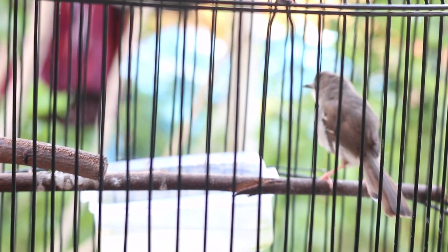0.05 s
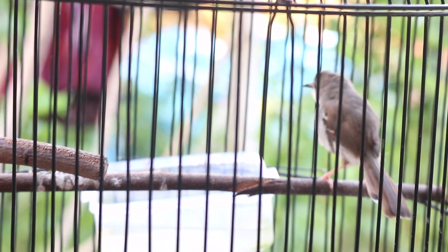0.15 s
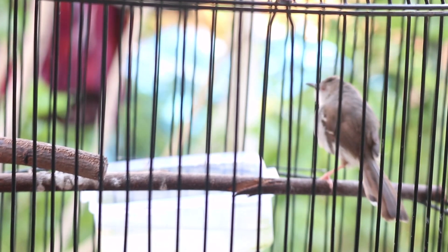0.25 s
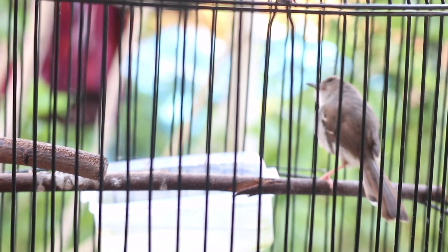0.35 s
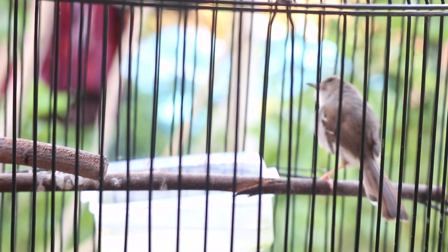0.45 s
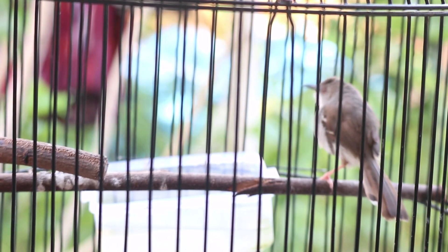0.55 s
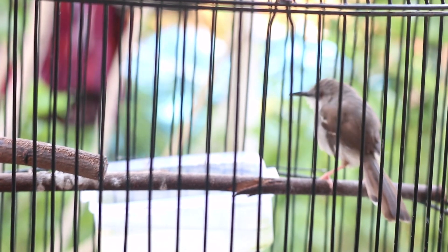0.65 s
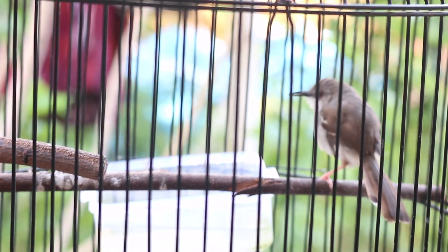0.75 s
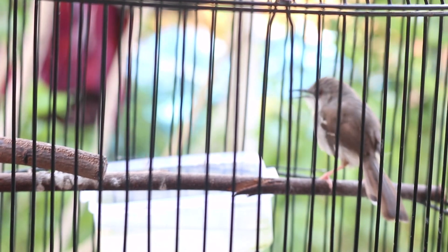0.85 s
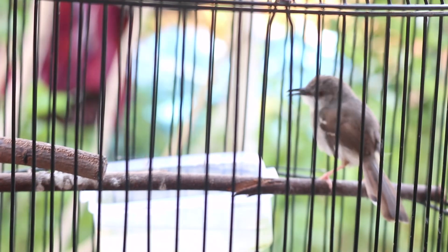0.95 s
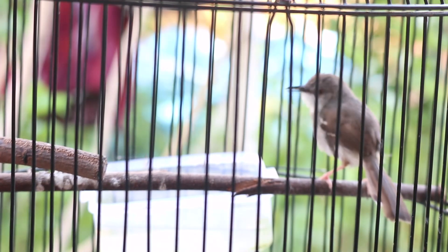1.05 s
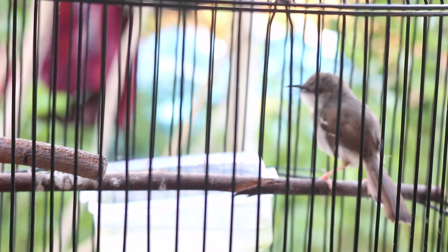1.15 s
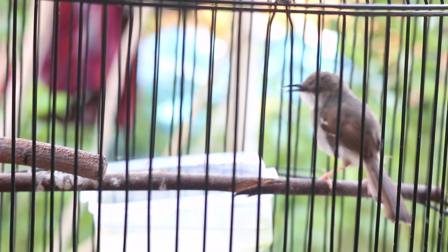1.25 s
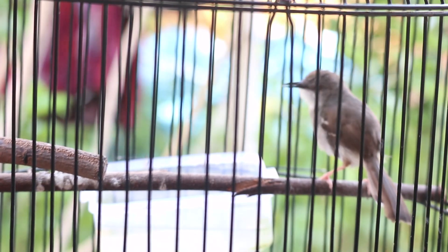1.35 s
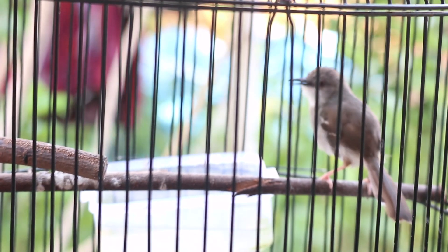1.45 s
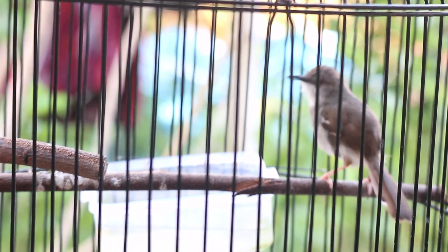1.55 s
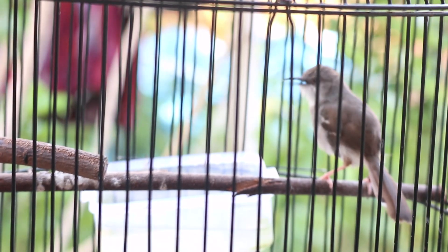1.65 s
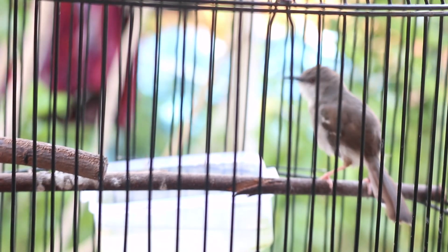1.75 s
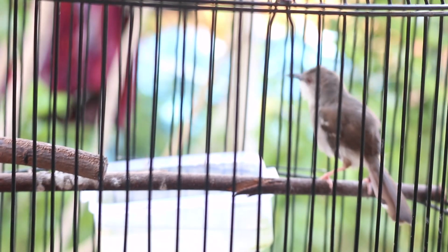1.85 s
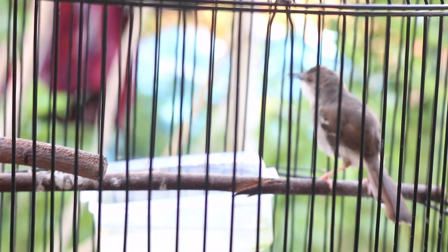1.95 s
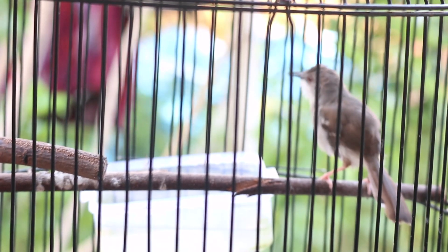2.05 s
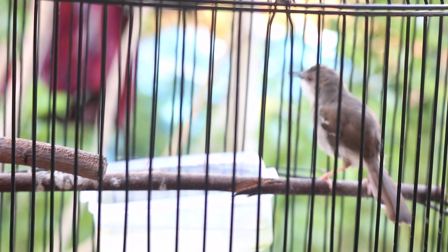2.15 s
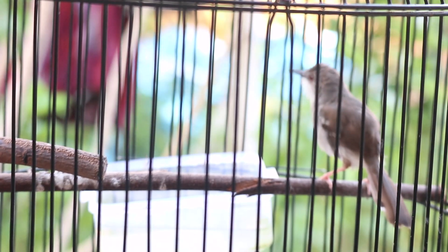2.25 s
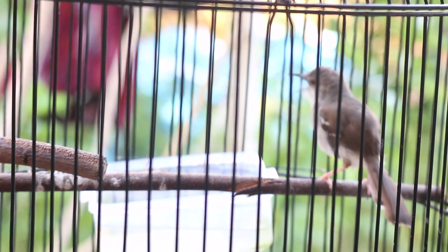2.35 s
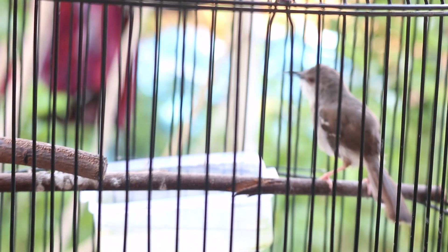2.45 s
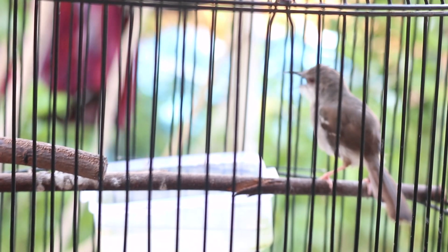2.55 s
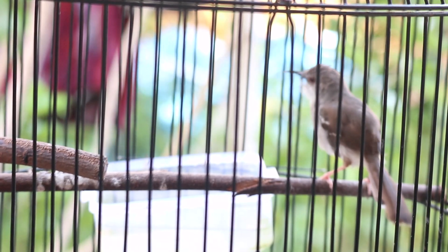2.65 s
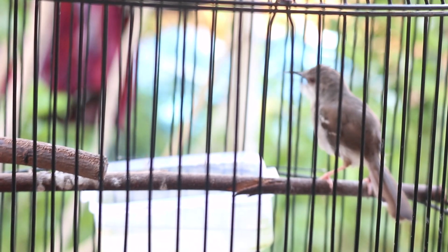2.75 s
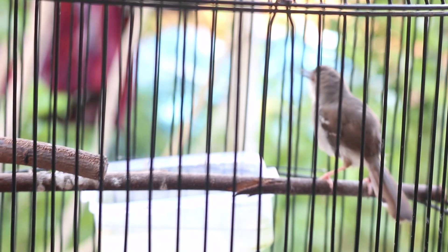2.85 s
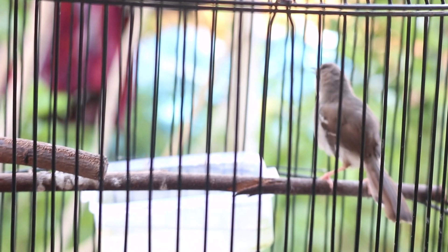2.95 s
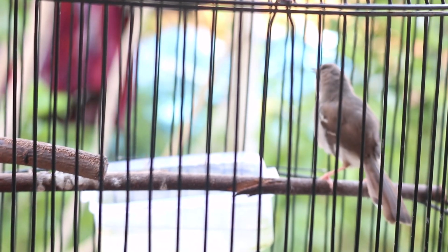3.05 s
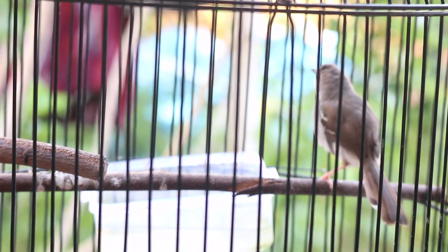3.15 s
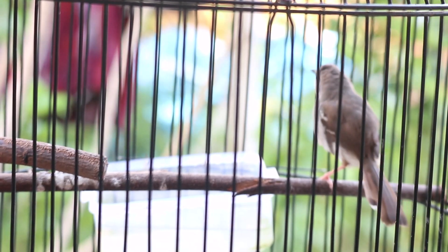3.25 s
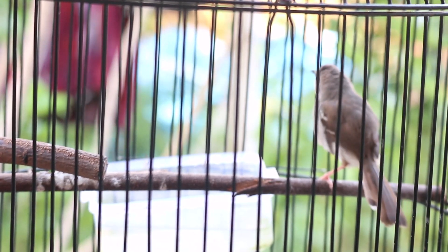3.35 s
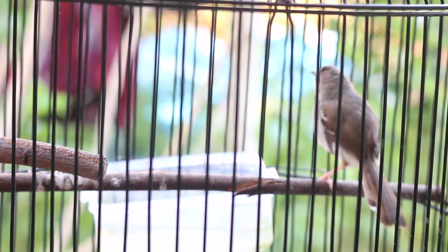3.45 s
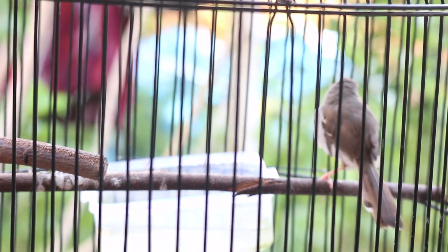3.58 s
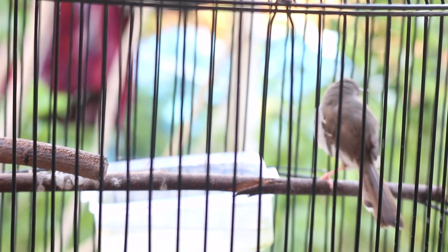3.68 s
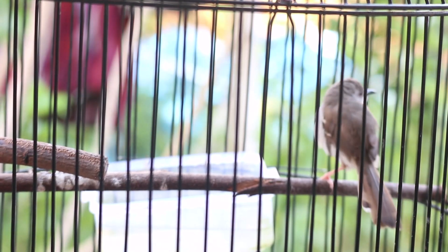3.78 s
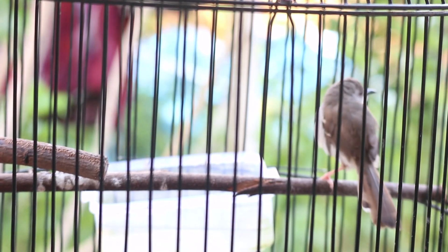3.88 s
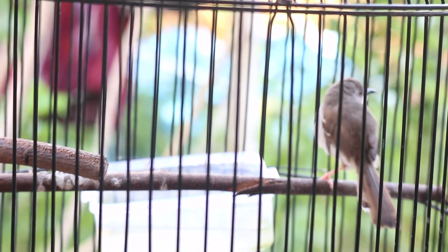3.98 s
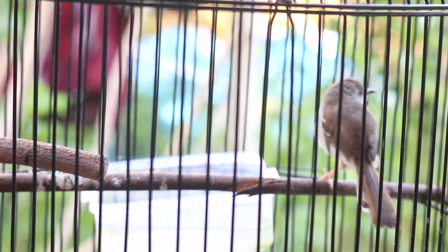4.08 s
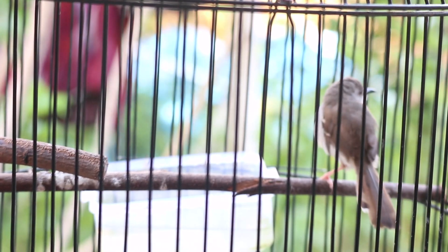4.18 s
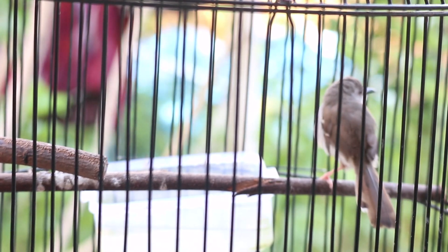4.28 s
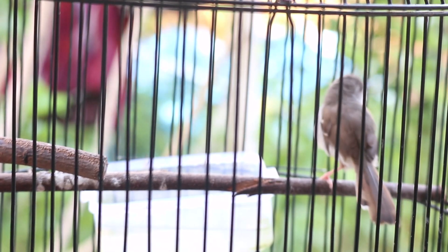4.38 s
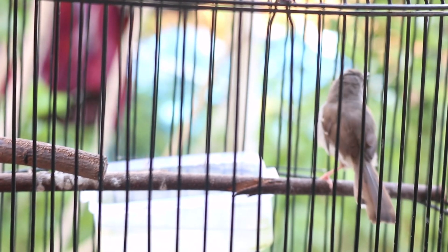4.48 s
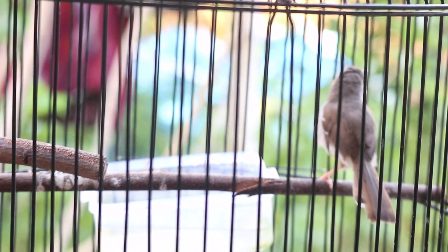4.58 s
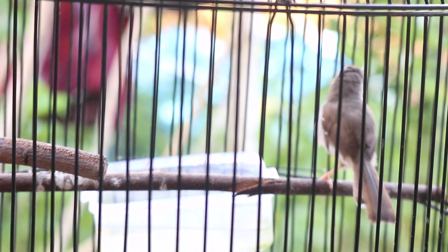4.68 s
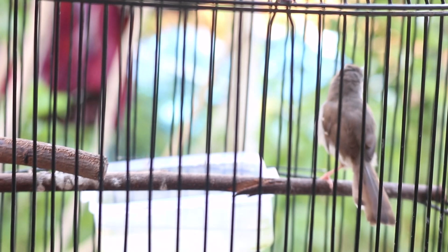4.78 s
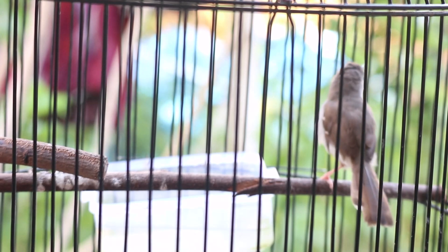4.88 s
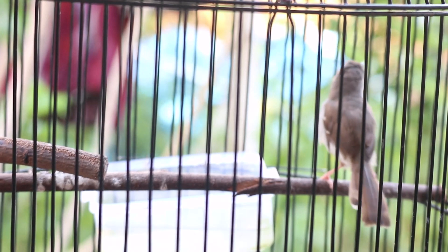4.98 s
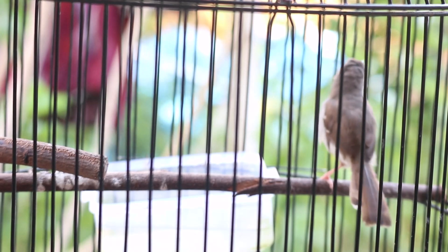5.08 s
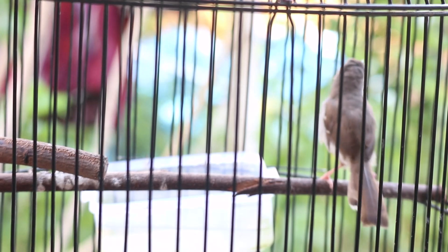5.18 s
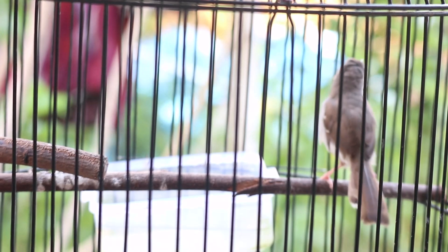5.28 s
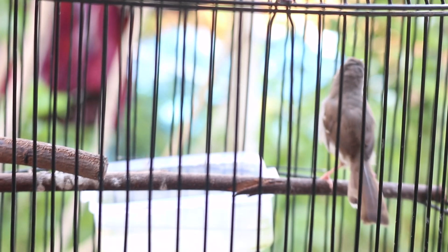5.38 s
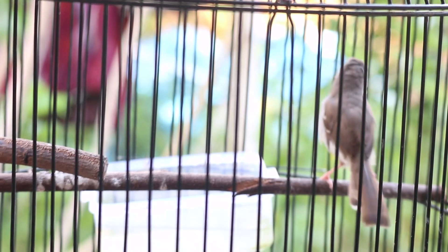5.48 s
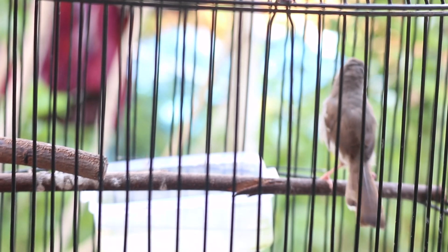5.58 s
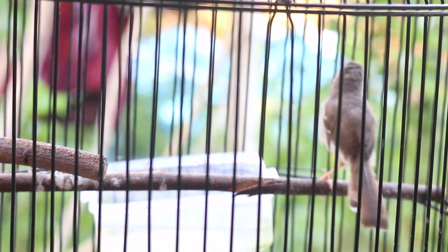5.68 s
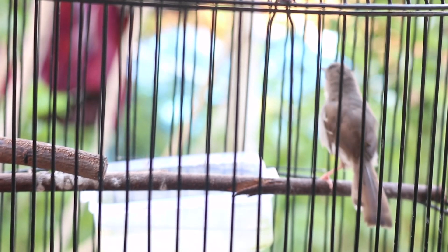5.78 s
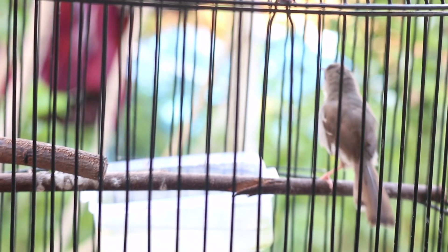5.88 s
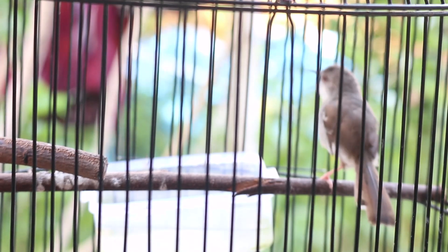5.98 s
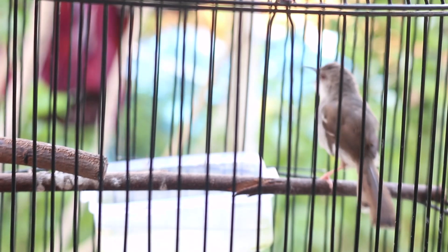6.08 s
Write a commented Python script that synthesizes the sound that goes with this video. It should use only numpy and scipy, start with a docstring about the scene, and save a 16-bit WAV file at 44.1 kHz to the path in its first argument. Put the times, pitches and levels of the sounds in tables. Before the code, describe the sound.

A quiet, low traffic rumble and soft air hiss run throughout, with a barely audible idling engine. One tiny tap sounds right at the start, and a few very faint, far whistles follow. At about 0.8 seconds a small caged songbird, close and clear, sings three sliding opening notes. From 1.3 to 2.9 seconds it runs into a fast trill of high, sharply falling whistles, about ten a second. The bird then pauses, and from around 3.5 seconds the low engine hum draws nearer, though it stays soft. At 4.4 seconds the three opening notes return, followed from 4.8 seconds by a second trill that continues to the end at about 6 seconds. The close walls of a porch give each note a short echo, and a faint treble fizz follows the song.

```python
"""Traffic rumble, air hiss and an idling engine come first, with one small tap and faint far whistles.
Then a small caged songbird sings two phrases on a porch: three sliding opening notes and a trill of fast
falling whistles. Each note is a nearly pure tone gliding in pitch, coloured by the bird's throat.
Close walls answer each note, and a faint treble fizz follows the song. The engine draws near
before the second phrase."""
import sys
import numpy as np
from scipy import signal
from scipy.fft import rfft, irfft, next_fast_len
from scipy.io import wavfile
from scipy.ndimage import uniform_filter1d, map_coordinates

SR = 44100
rng = np.random.default_rng(int(sys.argv[2]) if len(sys.argv) > 2 else 0)


def wrap_up_sound(samples):
    """Save the sound to the file named by the first command line argument, as 16-bit audio."""
    columns = np.atleast_2d(samples).T
    # keep every value between -1 and 1, then stretch to whole-number steps
    tamed = np.clip(columns, -1, 1)
    steps = np.round(tamed * 32767).astype(np.int16)
    wavfile.write(sys.argv[1], SR, steps)


N = 270333

# Slow swells of the background. Each row: time in seconds, rumble level in dB, street level in dB.
BACKGROUND_LEVELS = [(0, -48.5, -52.5), (.5, -51.5, -53.5), (1.4, -47.5, -53), (2.25, -50.5, -54),
                     (2.8, -47.5, -54), (3.3, -48, -54), (4.4, -46.5, -52), (4.85, -45, -53),
                     (5.2, -45.5, -51.5), (6.13, -44.5, -51)]
# Spectrum of the traffic rumble. Each row: frequency in Hz, relative density in dB.
RUMBLE_SPECTRUM = [(12, -45.5), (20, -31.5), (43, -6.5), (75, -7.5), (102, 0.5), (130, -5.5), (174, -8.5),
                   (236, -33), (268, -20.5), (300, -17), (390, -43.5), (660, -120)]
# Spectrum of street and air noise. Each row: frequency in Hz, relative density in dB.
STREET_SPECTRUM = [(120, -27), (200, -6), (260, -9.5), (372, -9), (503, -13), (701, -15), (1050, -16.5),
                   (2190, -21.5), (3420, -25), (4200, -25), (6300, -27.5), (9300, -29), (10300, -43.5),
                   (11500, -90)]
# Likeness of the background at the two sides. Each row: frequency in Hz, left-right correlation.
BACKGROUND_CORRELATION = [(60, 0.99), (130, 1), (280, 0.87), (590, 0.43), (1270, 0.23), (2720, 0.063),
                          (5820, -0.48)]
# The engine's idle. Each row: time in seconds, firing rate in Hz, level in dB.
ENGINE_IDLE = [(0, 29.02, -56.5), (1.5, 28.94, -61.5), (3.4, 28.99, -62), (3.62, 29.02, -45.5),
               (3.9, 29.07, -48), (4.3, 28.83, -40.5), (5, 28.49, -49), (5.5, 28.33, -43),
               (6.13, 28.3, -46)]
# Engine harmonics. Each row: multiple of the firing rate, relative level in dB.
ENGINE_HARMONICS = [(2, -4), (3, -22.5), (4, -2), (5, 2.5), (6, -9.5), (7, -9), (9, -12.5)]
# The tap. Each row: start in seconds, relative level in dB.
TAPS = [(0.0418, -33)]
# Modes of the tapped object. Each row: frequency in Hz, relative level in dB, 60 dB decay time in seconds.
TAP_MODES = [(1650, -9, 0.061), (1917, 4.5, 0.04), (2830, -2.5, 0.043), (3170, 0, 0.031),
             (3570, -4.5, 0.054), (4250, -8.5, 0.056)]
# Distant whistles. Each row: start and length in seconds, pitch and its rise in Hz, relative level in dB.
FAR_WHISTLES = [(0.058, 0.038, 635, 5, -65), (0.098, 0.12, 760, 11, -62), (.222, .14, 868, 5, -66),
                (0.598, .12, 2720, 19, -67), (.77, 0.075, 2750, 20, -62), (1.187, 0.48, 733, 25, -66),
                (4.404, .34, 1082, 108, -53)]
# First note of each phrase. Each row: start in seconds, level in dB, fall time in ms, low pitch in Hz,
# time of the crest in ms, rise time in ms, crest pitch in Hz.
DIP_NOTES = [(0.828, -27, 7, 1934, 35.5, 6.6, 3030), (4.371, -26.5, 4.6, 2143, 30, 8.5, 3205)]
# Second and third notes. Each row: time of the top in seconds, level in dB, top pitch in Hz,
# hold in ms, fall time in ms.
FLICK_NOTES = [(1.013, -16.5, 3664, 8.3, 32.4), (1.154, -14.5, 3890, 4.3, 38),
               (4.542, -16.5, 3774, 1.5, 39), (4.672, -14.5, 4170, 0.21, 38.6)]
# Trill notes. Each row: time of passing about 4 kHz in seconds, relative level in dB, fall time in ms.
TRILL_NOTES = [(1.2872, -16.5, 24.2), (1.4005, -14, 17.5), (1.5027, -13, 17.4), (1.6029, -12.5, 18.5),
               (1.7056, -11.5, 18.5), (1.809, -12, 17.0), (1.9132, -11.5, 17), (2.0171, -12, 19),
               (2.123, -12, 19), (2.2289, -10.5, 17.0), (2.3348, -10.5, 16.0), (2.441, -11.5, 17),
               (2.5511, -11, 18), (2.6622, -12, 18), (2.7716, -10.5, 19), (2.8786, -11.5, 20.0),
               (4.8297, -17, 21), (4.9375, -14, 17.0), (5.0418, -11.5, 17.0), (5.1439, -11, 17.0),
               (5.245, -10.5, 16.9), (5.3494, -10, 18.0), (5.4518, -10.5, 17.8), (5.5556, -10.5, 18.0),
               (5.664, -11, 16.5), (5.7742, -10.5, 18.5), (5.8827, -11.5, 18.0), (5.9878, -10, 17.0),
               (6.0961, -11, 19.0)]
# Response of the throat in the trill. Each row: pitch in Hz, gain in dB.
THROAT_RESPONSE = [(1300, -37), (1550, -24), (1900, -11.5), (2300, -3.5), (2800, -1), (3500, 2.5),
                   (4800, 3), (5600, 8.5), (6400, -9.5)]
# Overtones of a trill note. Each row: multiple of the pitch, level against the fundamental in dB.
TRILL_OVERTONES = [(2, -35), (3, -54)]
# The bird's poses. Each row: start in seconds, delay of the cage floor bounce in ms, its gain in dB.
POSES = [(0, .63, -9), (3.6, .66, -13)]
# First reflections from the walls. Each row: left delay in ms, right delay in ms, gain in dB.
WALL_ECHOES = [(4.16, 3.6, -15), (4.792, 5.6, -15), (6.864, 7.7, -15), (8.37, 8.8, -17.5), (9.57, 13, -22),
               (10.85, 8.7, -19.5), (12.47, 12.55, -12), (21.6, 21.05, -25), (25, 27, -18)]
# Reverberation. Each row: frequency in Hz, 60 dB decay time in seconds before a tail's stretch factor.
TAIL_DECAY = [(1500, 0.28), (3000, 0.21), (6000, 0.2), (12000, 0.12)]
# Stereo width of the reverberation. Each row: frequency in Hz, ratio of side to mid amplitude.
TAIL_WIDTH = [(1200, .2), (2500, .45), (5000, .8), (10000, 0.87)]
# Spectrum of the treble fizz. Each row: frequency in Hz, relative density in dB.
FIZZ_SPECTRUM = [(5500, -39.5), (6800, 2), (9000, -3), (12300, -1.5), (13500, -9.5), (15500, -19.5)]


def amp(db):
    """Amplitude ratio for a level in dB."""
    return 10 ** (np.asarray(db) / 20)


def unit(x):
    """The signal scaled to rms 1."""
    return x / np.sqrt(np.mean(x ** 2) + 1e-20)


def along(points, hz):
    """Interpolation of (Hz, value) points on a logarithmic frequency axis."""
    f, v = np.transpose(points)
    return np.interp(np.log(hz + 1), np.log(f + 1), v)


def curves(rows):
    """Linear interpolation of each column after the time, at every sample."""
    s, *columns = np.transpose(rows)
    return [np.interp(np.arange(N) / SR, s, column) for column in columns]


def bell(x):
    """A Gaussian of height 1 and half-width about 1."""
    return np.exp(-x ** 2)


def wobble(rate):
    """Smooth random modulation with `rate` knots a second."""
    return map_coordinates(rng.standard_normal(int(N * rate / SR) + 4), [np.arange(N) * rate / SR])


def filtered(x, response):
    """Linear filtering: the spectrum is multiplied by a frequency response."""
    size = next_fast_len(N + SR // 2)
    return irfft(rfft(x, size) * response(np.fft.rfftfreq(size, 1 / SR)), size)[..., :N]


def add(track, s, sound):
    """Superposition of a sound on the track at s seconds."""
    part = track[round(s * SR):][:len(sound)]
    part += sound[:len(part)]


def rush(spectrum, correlation, patchy_db):
    """Partly coherent stereo noise of rms 1, its gain patchy in time and frequency."""
    def mid_side_gains(hz):
        angle = np.arccos(np.clip(along(correlation, hz), -1, .9985)) / 2
        return amp(along(spectrum, hz)) * [np.cos(angle), np.sin(angle)]

    cells = signal.stft(rng.standard_normal((2, N)), nperseg=512)[2]
    patches = uniform_filter1d(rng.standard_normal(cells.shape[1:]), size=6, axis=0)
    patches = uniform_filter1d(patches, size=14, axis=1)
    pair = signal.istft(cells * amp(patchy_db * unit(patches)), nperseg=512)[1][:, :N]
    mid, side = filtered(pair, mid_side_gains)
    return unit(np.array([mid + side, mid - side]))


def traffic_and_air():
    """Broadband noise: swelling rumble and street hiss, most coherent at long wavelengths."""
    rumble_db, street_db = curves(BACKGROUND_LEVELS)
    rumble_gain = amp(rumble_db + 1.1 * wobble(3))
    rumble = rush(RUMBLE_SPECTRUM, BACKGROUND_CORRELATION, patchy_db=1.5)
    street = rush(STREET_SPECTRUM, BACKGROUND_CORRELATION, patchy_db=1.9)
    return rumble_gain * rumble + amp(street_db) * street


def engine():
    """Nearly periodic firing gives a harmonic series; each harmonic swells on its own."""
    firing_hz, db = curves(ENGINE_IDLE)
    phase = 2 * np.pi * np.cumsum(firing_hz * (1 + 0.0077 * wobble(6.2))) / SR
    hum = sum(amp(level + 3.0 * wobble(4)) * np.sin(k * phase + 0.78 * wobble(9))
              for k, level in ENGINE_HARMONICS)
    return amp(db) * unit(hum)


def tap():
    """An impact excites normal modes, each of which decays exponentially."""
    track, t = np.zeros(N), np.arange(SR // 4) / SR
    ring = sum(amp(level - 60 * t / t60) * np.sin(2 * np.pi * hz * t) for hz, level, t60 in TAP_MODES)
    attack = 1 - np.exp(-t / 0.00076)
    for s, db in TAPS:
        add(track, s, amp(db - 9.5) * ring * attack)
    return track


def tail(stretch):
    """A diffuse field of about unit energy per side; high frequencies decay soonest."""
    hz, t, (mid, side) = signal.stft(rng.standard_normal((2, SR // 2)), SR, nperseg=256)
    side = side * along(TAIL_WIDTH, hz)[:, None]
    fade = amp(-60 * t / (stretch * along(TAIL_DECAY, hz))[:, None])
    decay = signal.istft(np.array([mid + side, mid - side]) * fade, SR, nperseg=256)[1]
    return decay / np.linalg.norm(decay[0])


def distant(sound):
    """Far from a source, reverberation outweighs the direct sound."""
    return amp(-6.5) * sound + signal.fftconvolve(sound[None], tail(stretch=.8), axes=1)[:, :N]


def whistle(hz, db, overtones=()):
    """A gliding tone: phase is the integral of frequency, and overtones are multiples of it."""
    phase = 2 * np.pi * (np.cumsum(hz) / SR + rng.random())
    return amp(db) * (np.sin(phase) + sum(amp(level) * np.sin(k * phase) for k, level in overtones))


def far_whistles(fade_db=-8.5):
    """Frequency modulation: faint pure tones arch and waver in pitch as they fade."""
    track, waver = np.zeros(N), 1 + .017 * wobble(40)
    for s, length_s, base_hz, arch_hz, db in FAR_WHISTLES:
        progress = np.arange(0, 1, 1 / SR / length_s)
        hz = base_hz + arch_hz * np.sin(np.pi * progress ** .8) ** 2
        hz *= waver[round(s * SR):][:len(hz)]
        note = whistle(hz, db + fade_db * progress ** 2.8)
        add(track, s, note * signal.windows.tukey(len(note), .2))
    return track * np.sqrt(2) * amp(1.6 * wobble(30))


def flare(hz, resonance_hz=4510):
    """Resonance: the octave of a pitch flares as it crosses a throat mode. Nearness runs from 0 to 1."""
    return bell(np.log(2 * hz / resonance_hz) / 0.26)


def opening_note(hz, db, flare_db):
    """A smoothed glide with tapered ends, its second harmonic lifted by the throat resonance."""
    hz = uniform_filter1d(hz, int(2.4 * SR / 1000))
    overtones = [(2, -33 + flare_db), (3, -44)]
    return whistle(hz, db, overtones) * signal.windows.tukey(len(hz), .1)


def dip_notes(start_hz=4900, sink_ms=15, end_ms=15, flare_ms=15):
    """A frequency sweep opens each phrase: down, up to a louder crest, then sinking away."""
    track = np.zeros(N)
    for s, db, fall_ms, low_hz, crest_ms, rise_ms, crest_hz in DIP_NOTES:
        ms = np.arange(0, crest_ms + end_ms, 1000 / SR)
        before, after = np.maximum(crest_ms - ms, 0), np.maximum(ms - crest_ms, 0)
        fall, crest = np.exp(-(ms / fall_ms) ** 1.38), bell(before / rise_ms)
        hz = low_hz + (start_hz - low_hz) * fall + (crest_hz - low_hz) * crest
        hz *= bell(after / sink_ms)
        level_db = db + 2.5 * crest - 13.5 * (after / 10) ** 1.7
        flare_db = 29 * flare(hz) * bell((ms / flare_ms) ** 2)
        add(track, s, opening_note(hz, level_db, flare_db))
    return track


def flick_notes(rise_ms=10.5, low_hz=1903, swell_db_per_ms=4, resonance_hz=4510):
    """Exponential sweeps, fast up and slowly down; the octave flares only on the rise."""
    track, ms = np.zeros(N), np.arange(-11, 36.9, 1000 / SR)
    before, after = np.maximum(-ms, 0), np.maximum(ms, 0)
    for s, db, top_hz, hold_ms, fall_ms in FLICK_NOTES:
        falling_ms = np.hypot(after, hold_ms) - hold_ms
        hz = top_hz * np.exp(-falling_ms / fall_ms)
        hz = (hz ** 6 + low_hz ** 6.) ** (1 / 6)  # the fall levels out
        hz *= np.exp(-before / rise_ms)
        level_db = db - swell_db_per_ms * before - 6 * (after / 20) ** 2
        flare_db = 42 * flare(np.maximum(hz, resonance_hz / 2), resonance_hz) * (ms < 0)
        add(track, s + ms[0] / 1000, opening_note(hz, level_db, flare_db))
    return track


def trill(full_start_hz=6620, full_db=-13, drop_hz_per_db=359.5, bottom_hz=1291):
    """Source and filter: each note falls exponentially while the throat sets each pitch's strength."""
    track, scatter = np.zeros(N), rng.standard_normal((len(TRILL_NOTES), 2))
    for (s, db, fall_ms), (bottom_scatter, tilt) in zip(TRILL_NOTES, scatter):
        start_hz = full_start_hz + drop_hz_per_db * min(db - full_db, 0)  # soft notes start lower
        lead_ms = fall_ms * np.log(start_hz / 4000)
        ms = np.arange(-lead_ms - 3, 1.67 * fall_ms, 1000 / SR)
        hz = 4000 * np.exp(-ms / fall_ms)
        hz /= (1 + (hz / 6500) ** 9) ** (1 / 9)  # the note leaves its top pitch slowly
        floor_hz = bottom_hz * (1 + 0.064 * bottom_scatter)
        hz = (hz ** 5 + floor_hz ** 5) ** (1 / 5)  # and levels out at the bottom
        onset_db = -12 * np.exp(-(ms + lead_ms) / 2.32)
        tilt_db = 1.47 * tilt * np.log2(hz / 4000)  # colour varies from note to note
        level_db = db - 1.5 + onset_db + tilt_db + along(THROAT_RESPONSE, hz)
        release = np.clip((ms[-1] - ms) / 6, 0, 1)
        add(track, s + ms[0] / 1000, whistle(hz, level_db, TRILL_OVERTONES) * release)
    return track


def song():
    """Amplitude modulation: uneven breath pressure makes all the bird's notes flutter slightly."""
    return (dip_notes() + flick_notes() + trill()) * amp(0.87 * wobble(180))


def porch(bird, tail_delay_s=0.0043):
    """Convolution with direct path, reflections and tails; floor bounce and tails change with the pose."""
    out, t = np.zeros((2, N)), np.arange(N) / SR
    ends = [pose[0] for pose in POSES[1:]] + [np.inf]
    for (start, bounce_ms, bounce_db), end in zip(POSES, ends):
        diffuse = amp(-6) * tail(stretch=0.89) + amp(-16) * tail(stretch=1.96)
        response = np.pad(diffuse, ((0, 0), (round(tail_delay_s * SR), 0)))
        response[:, 0] = 1  # direct path
        for left_ms, right_ms, db in [(bounce_ms, bounce_ms, bounce_db)] + WALL_ECHOES:
            response[[0, 1], [round(left_ms * SR / 1000), round(right_ms * SR / 1000)]] += amp(db)
        phrase = bird * (t >= start) * (t < end)
        out += signal.oaconvolve(phrase[None], response, axes=1)[:, :N]
    return out


def fizz(bird, cutoff_hz=4300, window_s=0.011):
    """Envelope following: faint treble noise tracks the high part of the song and its echoes."""
    treble = filtered(bird, lambda hz: 1 / (1 + (cutoff_hz / (hz + 1)) ** 12))
    envelope = np.sqrt(abs(uniform_filter1d(treble ** 2, round(window_s * SR), axis=1)))
    gain = amp(-28 + 2.7 * wobble(12)) * envelope
    return gain * rush(FIZZ_SPECTRUM, correlation=[(9000, .1)], patchy_db=2.0)


def scene():
    """Superposition: the pressures of all sources add at the listener."""
    bird = porch(song())
    return bird + fizz(bird) + distant(far_whistles() + tap()) + engine() + traffic_and_air()


def record(dry):
    """Band limiting: an ideal low-pass filter keeps nothing above 15.7 kHz."""
    return filtered(dry, lambda hz: hz < 15700)


dry = scene()
out = record(dry)
wrap_up_sound(out)
```